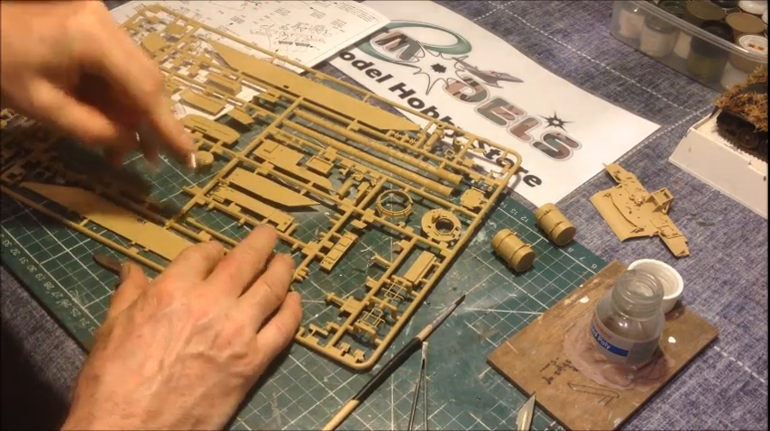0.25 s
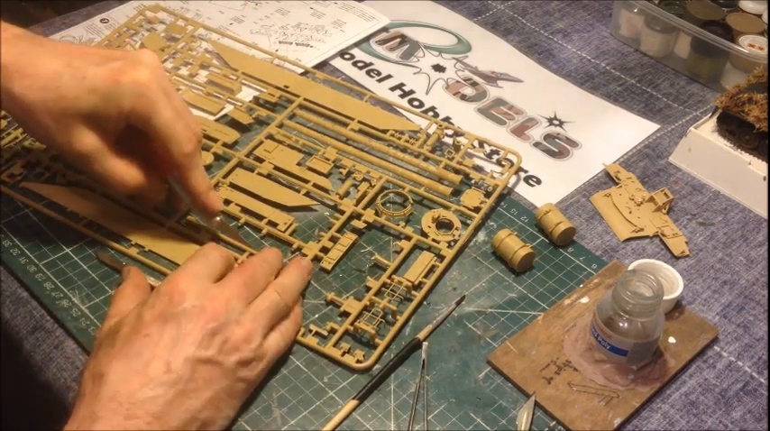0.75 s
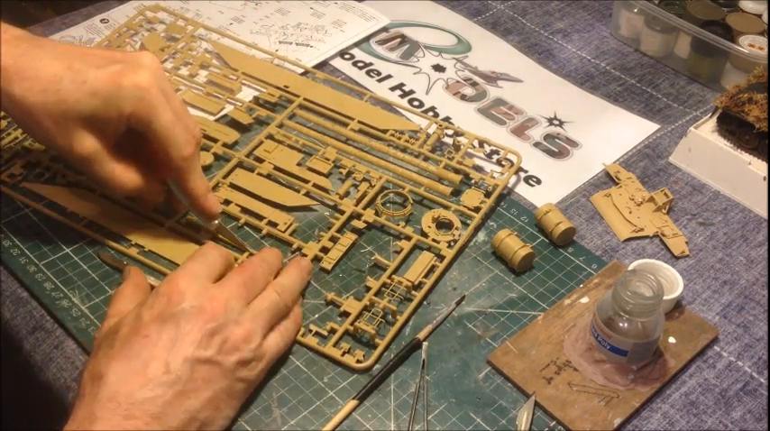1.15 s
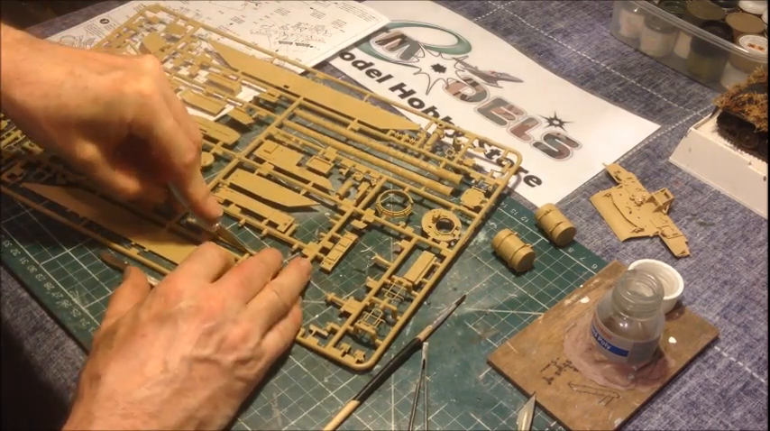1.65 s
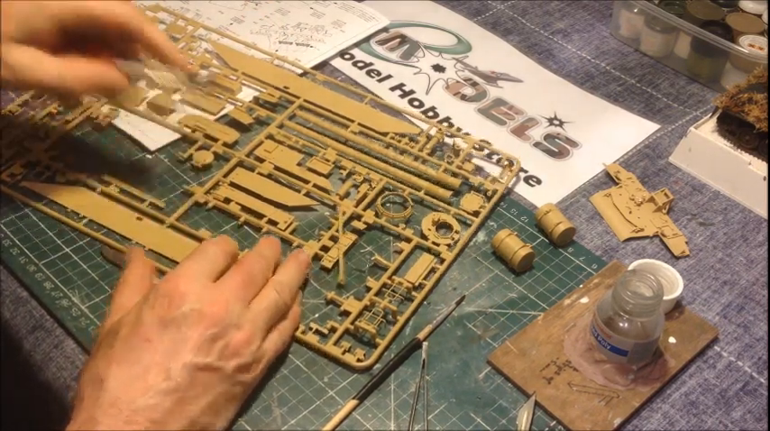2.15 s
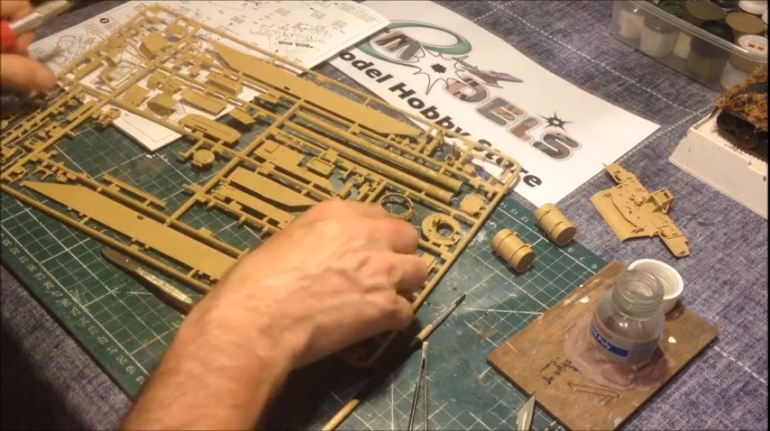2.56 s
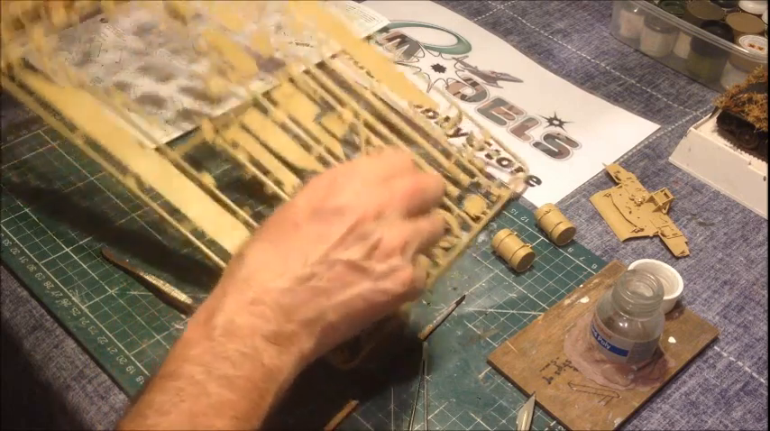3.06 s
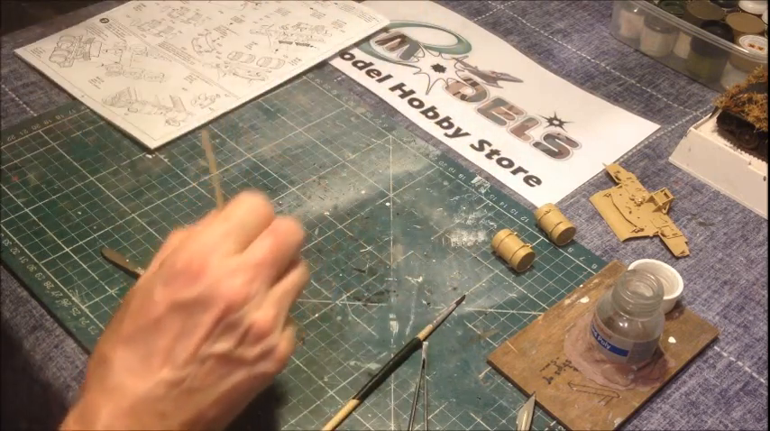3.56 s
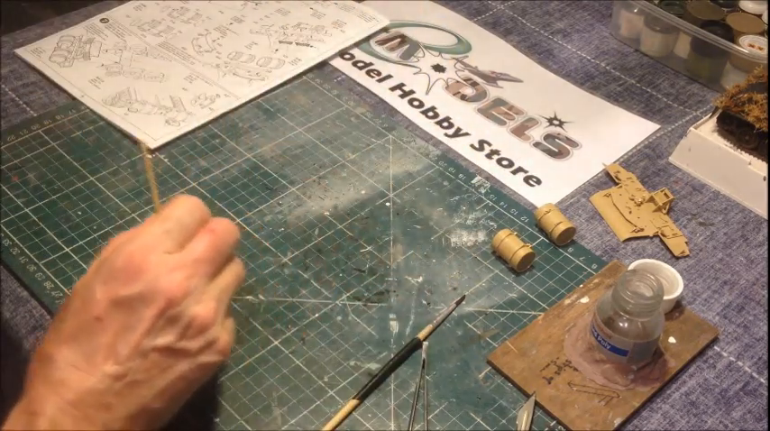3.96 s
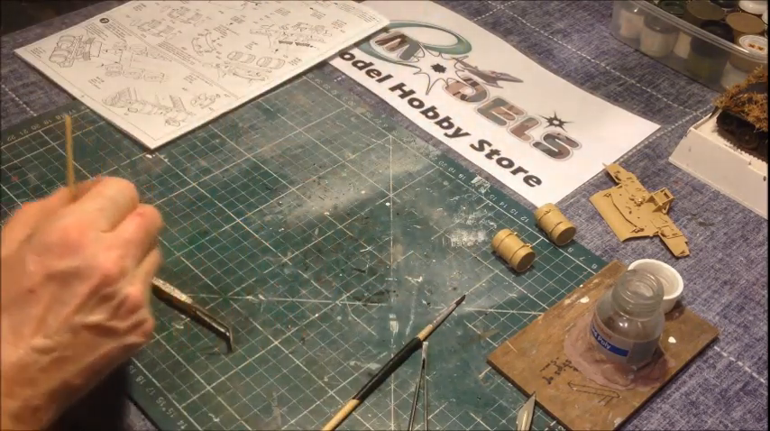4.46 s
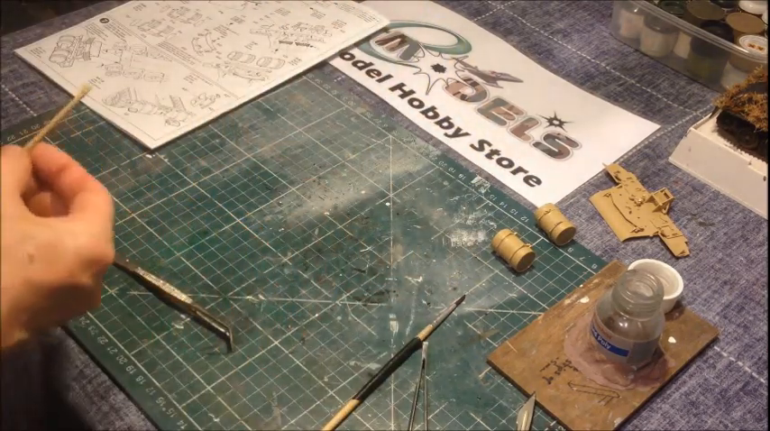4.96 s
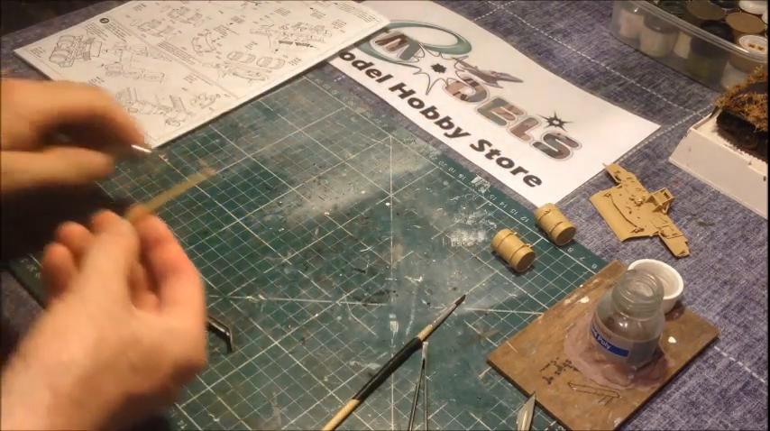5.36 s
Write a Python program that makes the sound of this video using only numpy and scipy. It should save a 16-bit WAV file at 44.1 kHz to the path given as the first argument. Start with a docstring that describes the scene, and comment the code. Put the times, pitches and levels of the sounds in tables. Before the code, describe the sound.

A small, fairly dry room, heard in mono near a work table, with faint steady hiss and two very thin high whines. At about 0.06-0.15 s a knife thumps the mat firmly and the plastic frame clicks; lighter clicks follow at 0.28 and 0.36 s. From 0.6 to 0.9 s the pressed blade gives an extremely faint, wavering high squeak, with a soft dull knock at 0.8 s. Quiet until 1.92 s, when the blade knocks through with the loudest, short woody thump. Bright tiny ticks of the cut rod come at 2.07-2.2 s, with a brief frame rattle and softer knock by 2.33 s. At 2.68-2.8 s the frame clicks and rattles with a low table boom, then slides faintly until 3.7 s. Tweezers tap at 4.12 s, then knock and scrape in a cluster at 4.55-4.85 s, strongest near 4.58 and 4.84 s, fading after 5.1 s into hiss.

```python
"""A hobby knife thumps a mat on a work table and the plastic sprue clicks; the pressed blade squeaks faintly.
The blade knocks through with the loudest thump, and the cut rod ticks high above the frame.
The sprue clicks, rattles and slides as it is lifted away; then the hand nudges tweezers across the mat.
Impacts and tiny friction slips excite decaying modes, filtered noise and the early reflections of a small room.
A faint steady hiss with two thin whines lies under everything."""
import sys
import numpy as np
from scipy import signal
from scipy.fft import rfft, irfft
from scipy.io import wavfile

SR = 44100
rng = np.random.default_rng(int(sys.argv[2]) if len(sys.argv) > 2 else 0)


def generate_wav(signal):
    """Clip the signal to [-1, 1] and save it as 16-bit WAV at the path in sys.argv[1]."""
    frames = np.transpose(np.atleast_2d(signal))
    scaled = np.clip(frames, -1, 1) * 32767
    pcm = np.round(scaled).astype(np.int16)
    wavfile.write(sys.argv[1], SR, pcm)


N = 247173
TIME = np.arange(N) / SR
RING = TIME[:SR // 2]  # time axis of one impulse response

# tugs that drag the edges of the sprue over the mat:
# (start of hold [s], length of hold [s], rattle level [dB], level of the table's boom [dB])
SPRUE_TUGS = [(2.137, 0.042, -45.5, -51), (2.68, 0.039, -42.5, -43), (2.776, 0.021, -43.5, -32)]


def table():
    """Impact and forced vibration: thumps on the mat excite the table; each tug of the frame makes it boom."""
    # blows into the mat and table:
    # (time [s], level [dB], bass [dB], treble [dB], sharpness of the contact [dB])
    impacts = [(.0615, -19, 5, 7, 5), (.079, -26.5, -4, 6, -13), (.147, -29, -33, -8.5, 4.5),
               (.792, -34.5, 4.5, -13, 4), (1.9178, -15, 2.5, 2, 3), (2.331, -31, 0, 2.5, -9),
               (2.43, -56.5, 8.5, -3, -10), (2.772, -45, 4, -2, -15), (4.665, -40, 12, 13, -5),
               (4.736, -36, 5.5, 2.5, -8), (4.8385, -36, 10, -13, 1)]
    # ringing modes of the table: (frequency [Hz], level [dB], t60 [s])
    modes = [(137, -8.5, 0.21), (159.7, -15.5, 0.46), (231, -12, 0.22), (312, 2.5, 0.18), (397.5, -9, 0.25),
             (459, -8, 0.15), (632.3, 3.5, 0.096), (768, 5.5, 0.063), (1064, -2, 0.17), (1148, 5, 0.068),
             (1240, -3.5, 0.03), (1373, -10.5, 0.18), (2170, -10, 0.13), (2290, -11, 0.12),
             (2490, -23, 0.24)]
    # dense remainder of the table's modes: (frequency [Hz], level [dB])
    body = [(55, -43.5), (100, -18.5), (135, -10), (320, -0.5), (700, 0), (1200, -2), (1550, -10.5),
            (2500, -17.5), (4500, -25.5), (8000, -21), (11000, -33), (15000, -32)]
    # the table top booming under the dragged frame: (frequency [Hz], level [dB])
    boom_body = [(60, -26), (100, -16), (135, 13), (240, 2.5), (330, -22), (700, -38), (3000, -58)]
    thumps = blows(impacts, body, modes, push_db=10.5, crack_db=2, crack_t60=0.034,
                   room_db=-0.5, room_t60=0.18, modes_db=-17.5)
    weight = sum(undb(db) * stroke(start, length, attack_s=0.0116, release_s=0.059)
                 for start, length, _, db in SPRUE_TUGS)
    boom = friction(boom_body, modes, slips_per_s=560, spread_db=-2.5, modes_db=-31, room_t60=0.17)
    return thumps + weight * boom


def sprue():
    """Impact and sliding friction: the plastic frame clicks, catches on the mat and slides away."""
    # clicks of the frame: (time [s], level [dB], bass [dB], treble [dB], sharpness of the contact [dB])
    impacts = [(.001, -44.5, -2.5, 1, 3.5), (.0652, -31.5, -1, -3, 8), (.2812, -35.5, -5, -0.5, 5.5),
               (.3575, -44.5, -14, -13.5, 7), (1.985, -36.5, -42, -11.5, -1), (2.168, -45, 5.5, -7, -17),
               (2.266, -59.5, 3, 3, 6), (2.679, -43, -17, 9, 2.5), (2.696, -38.5, -5, -2.5, 3),
               (2.752, -45.5, -3, 0, 6), (2.7688, -40.5, 3.5, -18, 11), (2.778, -44, 3, -1, 2),
               (2.9244, -57, -2, -9, 8), (3.0122, -52.5, -18, -1, 4.5)]
    # ringing modes of the frame: (frequency [Hz], level [dB], t60 [s])
    modes = [(142.1, -4.5, 0.24), (358.3, -3, 0.36), (946, -2.5, 0.2), (987, 3.5, 0.18), (1092, -10, 0.11),
             (1236, 6, 0.13), (1522, -12, 0.052), (1520, -14, 0.1), (7970, -2.5, .13)]
    # dense remainder of the frame's modes: (frequency [Hz], level [dB])
    body = [(60, -16.5), (140, 4.5), (350, 5), (620, -6), (1000, 5), (1800, -2), (2500, -6), (3200, -3),
            (4800, -3), (6500, -2.5), (8500, -0.5), (10800, -9), (13300, -6), (15000, -10.5)]
    # spectrum of the smoothly sliding frame: (frequency [Hz], level [dB])
    slide_body = [(100, -48), (370, 8), (600, -8), (1000, 5), (1250, -2.5), (1600, 3), (2300, -8.5),
                  (2950, -3.5), (3800, -7.5), (5000, -5.5), (8000, -17), (14000, -25)]
    # smooth slides as the frame is turned and lifted:
    # (start of hold [s], length of hold [s], level [dB], treble [dB])
    slide_events = [(2.153, 0.022, -43, -14), (2.242, 0.14, -58, 7), (2.753, 0.085, -49, 5),
                    (2.61, .005, -63.5, 5), (2.98, .015, -57.5, -1), (3.142, .015, -52.5, -16),
                    (3.258, 0.056, -45.5, -8.5), (3.34, 0.013, -54.5, 10), (3.61, 0.013, -60, -4),
                    (3.684, 0.043, -68.5, 6)]
    clicks = blows(impacts, body, modes, push_db=12.5, crack_db=-1.0, crack_t60=0.023,
                   room_db=1, room_t60=0.16, modes_db=-19.0)
    catch = sum(undb(db) * stroke(start, length, attack_s=0.0051, release_s=0.031)
                for start, length, db, _ in SPRUE_TUGS)
    rattle = friction(body, modes, slips_per_s=240, spread_db=2.5, modes_db=-17.5, room_t60=0.077)
    slide = friction(slide_body, modes, slips_per_s=2400, spread_db=5.0, modes_db=-24, room_t60=0.079)
    dull = lowpass(slide, 2340)
    bright = slide - dull
    slides = np.zeros(N)
    for start, length, db, treble_db in slide_events:
        motion = stroke(start, length, attack_s=0.033, release_s=0.024)
        slides += undb(db) * motion * (dull + undb(treble_db) * bright)
    return clicks + catch * rattle + slides


def rod():
    """Modal resonance: the small, stiff rod ticks against the frame and rings far higher than it."""
    # the thin rod snapping free and ticking against the frame:
    # (time [s], level [dB], bass [dB], treble [dB], sharpness of the contact [dB])
    impacts = [(2.0705, -31.5, 1, 2.5, 0.5), (2.1375, -48.5, 3, -6, 11.5), (2.198, -52, -11, 3, -2),
               (2.2145, -45, 4, -1.5, 7)]
    # ringing modes of the rod: (frequency [Hz], level [dB], t60 [s])
    modes = [(374, 0, 0.17), (437, -3.5, 0.2), (1006, 1.5, 0.18), (3340, -5.5, 0.15), (6380, 3, 0.13),
             (8000, 3, .14), (13000, -14, 0.055), (12220, -21, 0.11), (13400, -3, 0.1), (13900, 3, 0.11)]
    # dense remainder of the rod's modes: (frequency [Hz], level [dB])
    body = [(60, -32), (150, -4.5), (380, -0.5), (620, -13), (1000, -2), (2500, -7), (3100, 0.5),
            (3700, -8.5), (6300, -1.5), (9000, -3), (11000, -6.5), (12100, 0), (13600, 0), (15000, -10)]
    return blows(impacts, body, modes, push_db=-1, crack_db=4.5, crack_t60=0.021,
                 room_db=0.5, room_t60=0.14, modes_db=-18.0)


def tweezers():
    """Impact and sliding friction: the tweezers rock and slide on the mat under the hand."""
    # knocks of the tweezers: (time [s], level [dB], bass [dB], treble [dB], sharpness of the contact [dB])
    impacts = [(4.1195, -31.5, -2, 3, -4), (4.5492, -31.5, -0.5, 4, 3), (4.5775, -24, -2.5, 2, 5),
               (4.599, -33, 4, -11, -14), (4.6375, -31.5, -4, 7, -12), (4.648, -31, -3, -25, -18),
               (4.8355, -23, -8, -4, 3), (4.9577, -34, -7.5, -12, 5), (5.0241, -50, -19, -21, 5.5),
               (5.088, -54.5, -11, -21, 6)]
    # ringing modes of the tweezers: (frequency [Hz], level [dB], t60 [s])
    modes = [(305, -9, 0.34), (371.4, 1.5, 0.13), (392, 0, 0.16), (580, -8, 0.21), (773, -10.5, 0.19),
             (1065, -11.5, 0.16), (1462, -6, 0.12), (2270, -16, 0.099), (2980, -17.5, 0.073),
             (3320, -15, 0.1)]
    # dense remainder of their modes: (frequency [Hz], level [dB])
    body = [(60, -38), (120, -20), (165, -3.5), (350, 2.5), (800, -2.5), (1400, -0.5), (2300, -9),
            (3300, -7.5), (4400, -11.5), (7000, -19.5), (11000, -32.5), (15000, -33)]
    # shoves of the hand: (start of hold [s], length of hold [s], level [dB], bass [dB])
    shoves = [(4.548, 0.033, -40, -10), (4.613, 0.057, -41.5, 3.5), (4.808, 0.011, -40.5, -1.5)]
    out = blows(impacts, body, modes, push_db=11.5, crack_db=3.0, crack_t60=0.0092,
                room_db=1.0, room_t60=0.15, modes_db=-8.5)
    slide = friction(body, modes, slips_per_s=900, spread_db=6.0, modes_db=-22.0, room_t60=0.11)
    low = lowpass(slide, 1300)
    high = slide - low
    for start, length, db, bass_db in shoves:
        motion = stroke(start, length, attack_s=0.012, release_s=0.078)
        out += undb(db) * motion * (high + undb(bass_db) * low)
    return out


def squeak():
    """Frequency and amplitude modulation: a thin tone rises, then sags, and flickers as the blade grips."""
    # pitch while the blade presses into the plastic: (time [s], centre of the wavering pitch [Hz])
    pitch = [(.59, 10200), (.66, 11850), (.71, 12050), (.79, 11800), (.84, 11450), (.89, 11480)]
    level_db, flicker_db = -80, 7  # flicker per standard deviation of the grip
    jitter = 0.0068  # standard deviation of pitch, as a fraction
    edge_s = 0.012  # time constant of onset and decay
    s, hz = np.transpose(pitch)
    waver = lowpass(rng.standard_normal(N), 150)
    grip = lowpass(lowpass(rng.standard_normal(N), 20), 20)
    wavering_hz = np.interp(TIME, s, hz) * (1 + jitter * waver / waver.std())
    phase = 2 * np.pi * np.cumsum(wavering_hz) / SR
    level = undb(level_db + flicker_db * np.clip(grip / grip.std(), -2, 1))
    return level * stroke(s[0], s[-1] - s[0], edge_s, edge_s) * np.sin(phase)


def air():
    """Filtered random noise: steady room air and microphone hiss, with whines from narrow resonances."""
    # spectrum of the hiss: (frequency [Hz], relative level [dB])
    spectrum = [(18, -88.5), (30, -34), (192, -2.5), (410, -6.5), (492, -8), (691, -9.5), (767, -8.5),
                (921, -12), (1200, -12), (1640, -14.5), (1820, -14.5), (4090, -16.5), (6720, -19),
                (14000, -25), (15500, -17)]
    # narrow whines in the hiss: (frequency [Hz], width [Hz], RMS level [dB])
    whines = [(6790, 120, -84), (13590, 170, -88.5)]
    hiss = colour(rng.standard_normal(N), spectrum)
    out = undb(-68) * hiss / hiss.std()
    for hz, width, db in whines:
        whine = signal.lfilter(*signal.iirpeak(hz, hz / width, fs=SR), rng.standard_normal(N))
        out += undb(db) * whine / whine.std()
    return out


def blows(events, body, modes, push_db, crack_db, crack_t60, room_db, room_t60, modes_db):
    """Impulse excitation: a push and a crack; each event sets its own bass, treble and sharpness of contact."""
    bass_hz, middle_hz, treble_hz = 324, 1630, 9500
    out = np.zeros(N)
    for start, db, bass_db, treble_db, sharp_db in events:
        contact = undb(crack_db) * rng.standard_normal(len(RING)) * fade(crack_t60)
        contact[0] += undb(push_db)
        excitation = undb(sharp_db) * contact + undb(room_db) * reflections(room_t60)
        sound = colour(excitation, body) + undb(modes_db) * ringing(modes)
        tone = [(bass_hz, bass_db), (middle_hz, 0), (treble_hz, treble_db)]
        add(out, undb(db) * colour(sound, tone), start)
    return out


def friction(body, modes, slips_per_s, spread_db, modes_db, room_t60):
    """Stick-slip as a random impulse train: tiny uneven slips each ring the body and the room."""
    happens = rng.random(N) < slips_per_s / SR
    direction = rng.choice([-1, 1], N)
    size = undb(spread_db * np.clip(rng.standard_normal(N), -2, 2))
    slips = happens * direction * size
    space = reflections(room_t60)
    space[0] += undb(23)  # the direct sound
    response = (colour(space, body) + undb(modes_db) * ringing(modes)) / np.linalg.norm(space)
    return signal.fftconvolve(slips / slips.std(), response)[:N]


def ringing(modes, detune=0.0041, build_s=0.0034):
    """Modal superposition: damped sines, each detuned slightly at random at every call."""
    shift = 1 + detune * rng.standard_normal(len(modes))
    tones = np.zeros(len(RING))
    for k, (hz, db, t60) in enumerate(modes):
        sine = np.sin(2 * np.pi * hz * shift[k] * RING)
        tones += (-1) ** k * undb(db) * fade(t60) * sine  # alternate polarity
    return tones * (1 - np.exp(-RING / build_s))


def reflections(t60, build_s=0.0012, late_db=-25, late_t60=0.7, late_hz=900):
    """Diffuse reverberation: dense early reflections build up quickly and leave a faint dull tail."""
    early, late = rng.standard_normal((2, len(RING)))
    tail = undb(late_db) * lowpass(late, late_hz) * fade(late_t60)
    return (early * fade(t60) + tail) * (1 - np.exp(-RING / build_s))


def stroke(start, length, attack_s, release_s):
    """Motion envelope: an exponential rise up to start, a hold for length, then an exponential decay."""
    rise = np.minimum(TIME - start, 0) / attack_s
    decay = np.maximum(TIME - start - length, 0) / release_s
    return np.exp(rise - decay)


def fade(t60):
    """Exponential damping: a decay that loses 60 dB in t60 seconds."""
    return np.exp(-np.log(1000) * RING / t60)


def colour(x, points, size=4096):
    """Minimum-phase filtering: a causal response through (Hz, dB) points, by folding the cepstrum."""
    hz, db = np.transpose(points)
    bins = np.maximum(np.arange(size // 2 + 1), 1) * SR / size
    cepstrum = irfft(np.log(undb(np.interp(np.log(bins), np.log(hz), db))))
    cepstrum[1:size // 2] *= 2
    cepstrum[size // 2 + 1:] = 0
    return signal.fftconvolve(x, irfft(np.exp(rfft(cepstrum))))[:len(x)]


def lowpass(x, hz):
    """First-order low-pass filtering: a slope of 6 dB an octave."""
    return signal.sosfilt(signal.butter(1, hz, fs=SR, output="sos"), x)


def undb(db):
    """Logarithmic level: decibels to amplitude gain."""
    return 10 ** (np.asarray(db) / 20)


def add(track, sound, start):
    """Linear superposition: mix a sound into the track at a time in seconds."""
    i = max(int(start * SR), 0)
    track[i:i + len(sound)] += sound[:N - i]


def scene():
    """Superposition of everything on the work table, heard from one point."""
    return (table() + sprue() + rod() + tweezers() + squeak() + air())[None]


def record(dry):
    """Band limiting: the recorder cuts steeply above 15.5 kHz."""
    # tenth-order elliptic filter: 0.2 dB ripple, 70 dB rejection
    return signal.sosfilt(signal.ellip(10, .2, 70, 15500, fs=SR, output="sos"), dry)


dry = scene()
out = record(dry)
generate_wav(out)
```